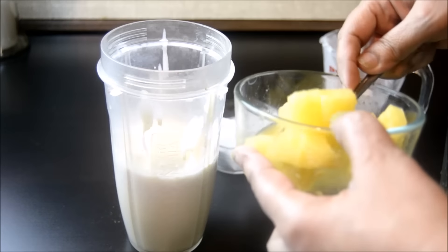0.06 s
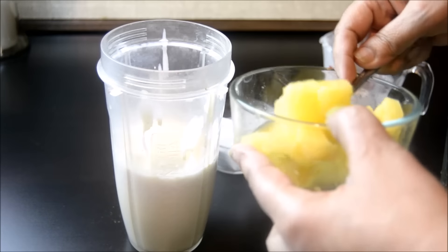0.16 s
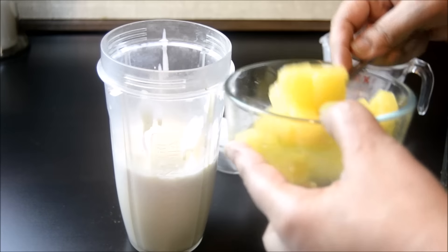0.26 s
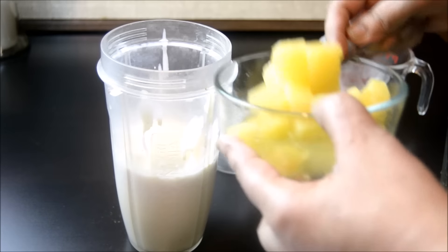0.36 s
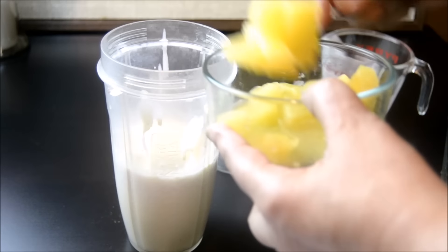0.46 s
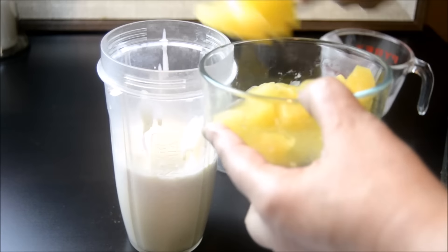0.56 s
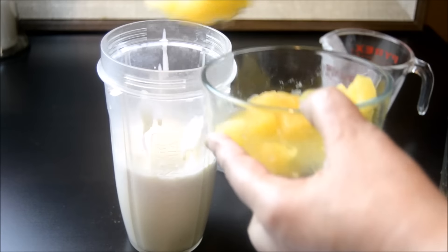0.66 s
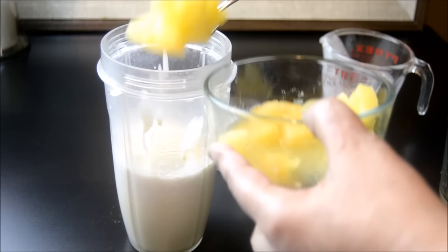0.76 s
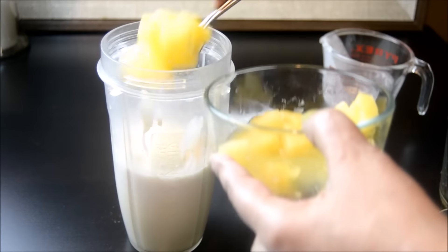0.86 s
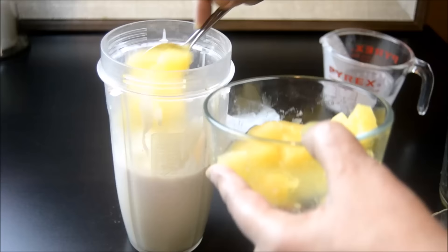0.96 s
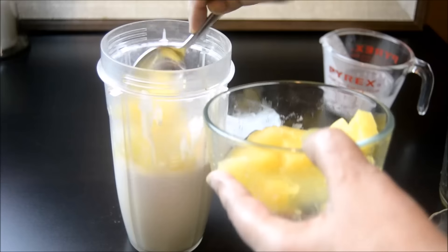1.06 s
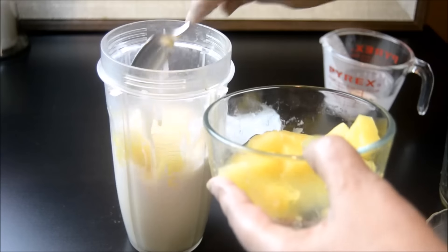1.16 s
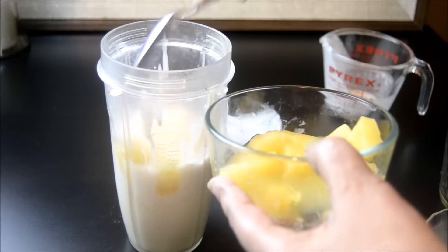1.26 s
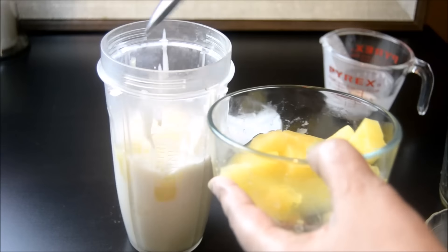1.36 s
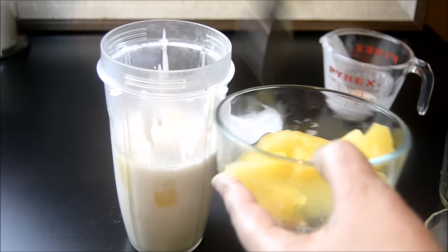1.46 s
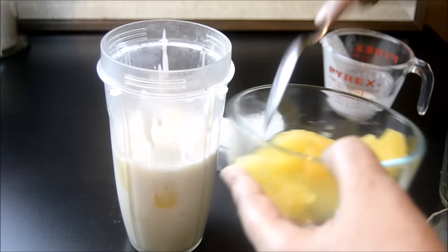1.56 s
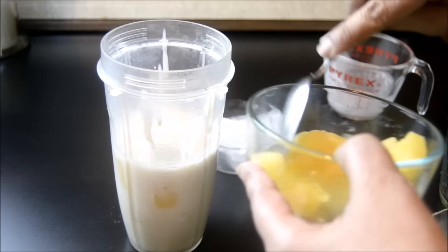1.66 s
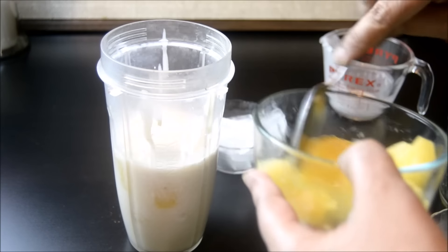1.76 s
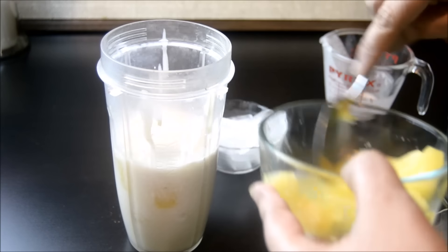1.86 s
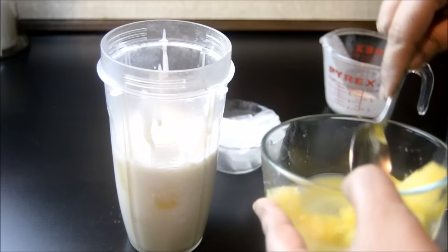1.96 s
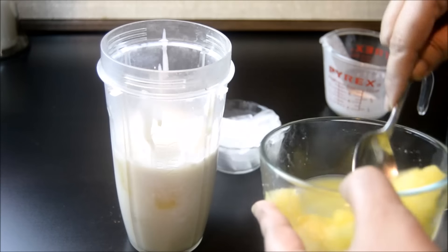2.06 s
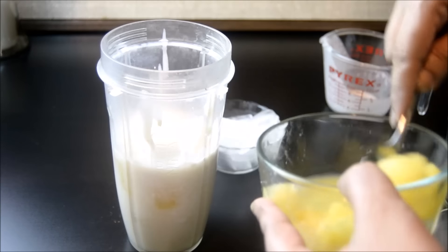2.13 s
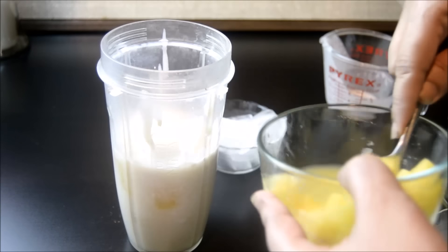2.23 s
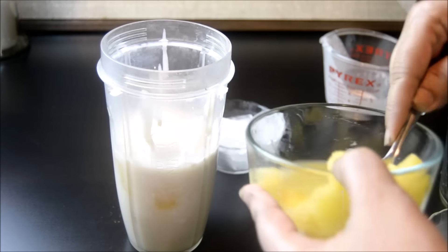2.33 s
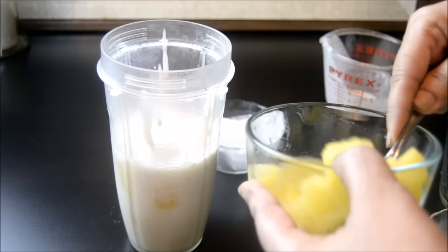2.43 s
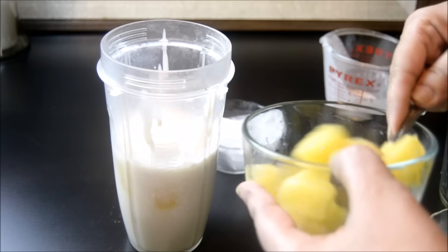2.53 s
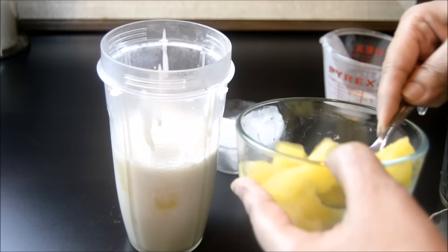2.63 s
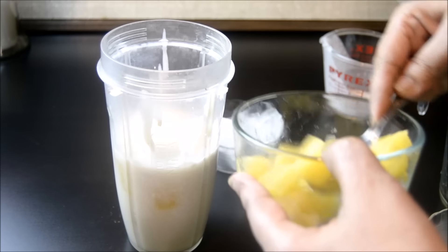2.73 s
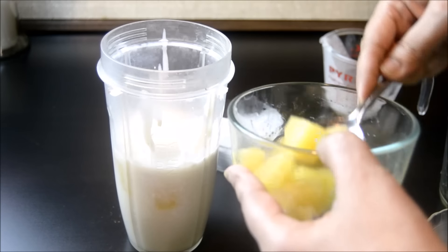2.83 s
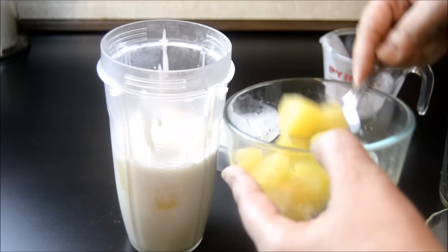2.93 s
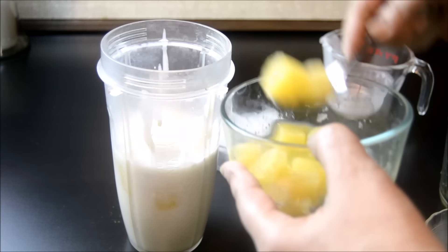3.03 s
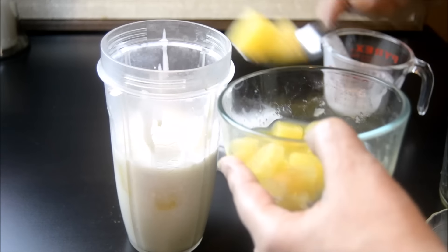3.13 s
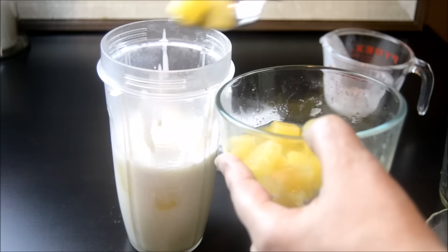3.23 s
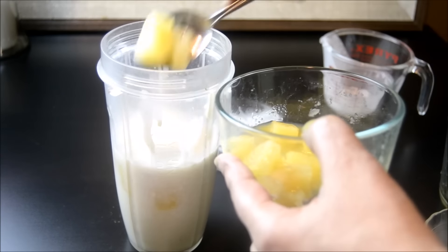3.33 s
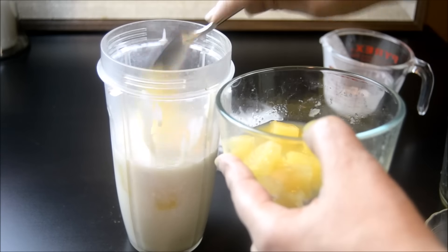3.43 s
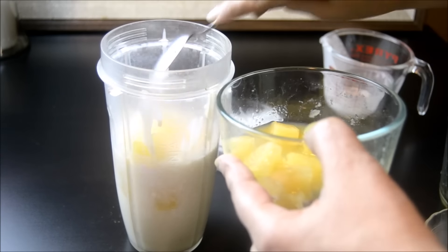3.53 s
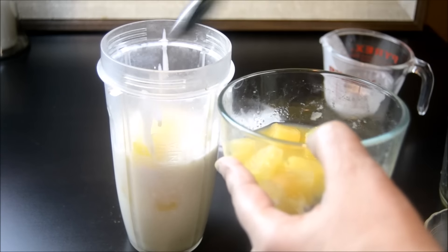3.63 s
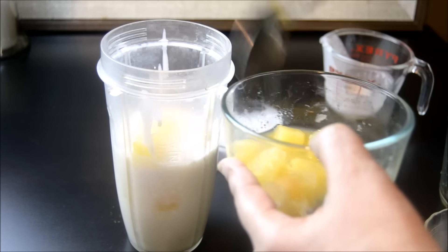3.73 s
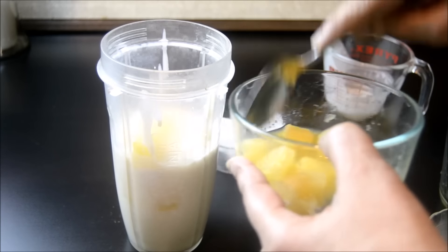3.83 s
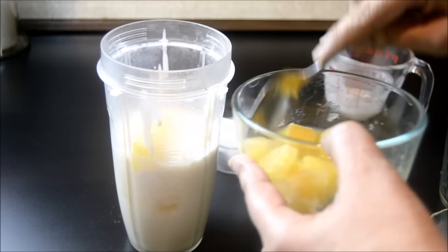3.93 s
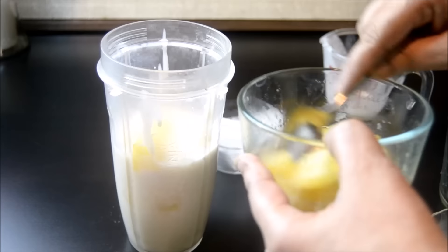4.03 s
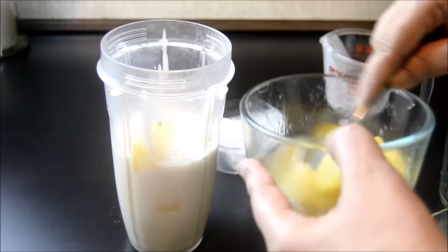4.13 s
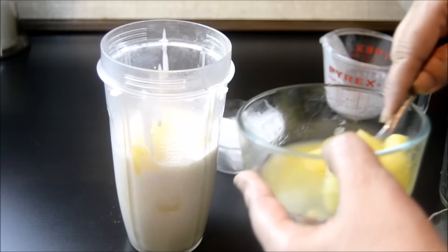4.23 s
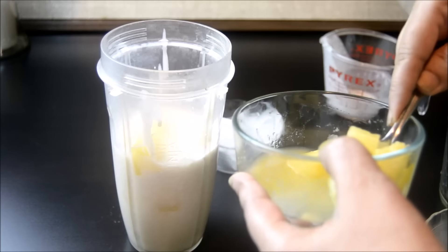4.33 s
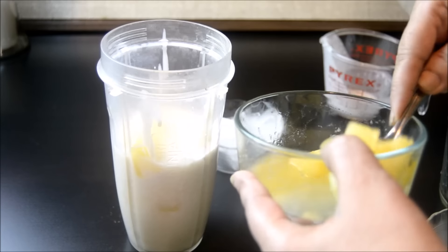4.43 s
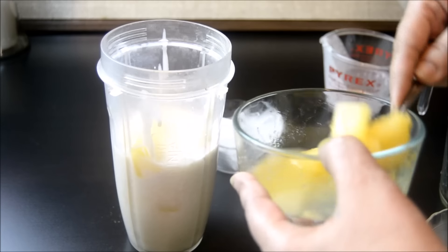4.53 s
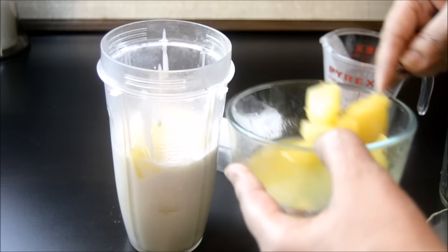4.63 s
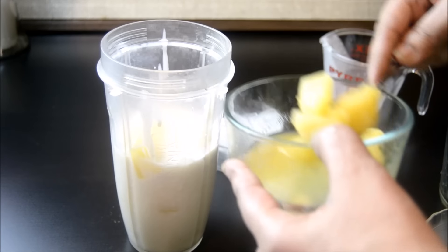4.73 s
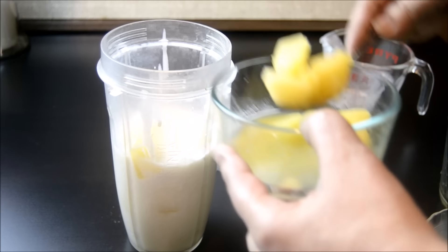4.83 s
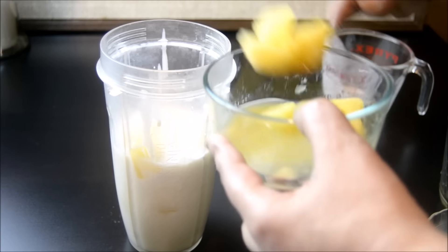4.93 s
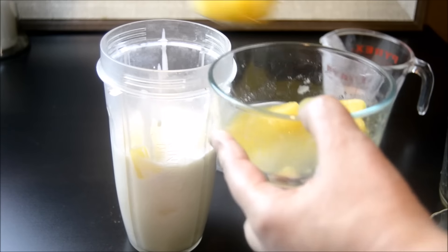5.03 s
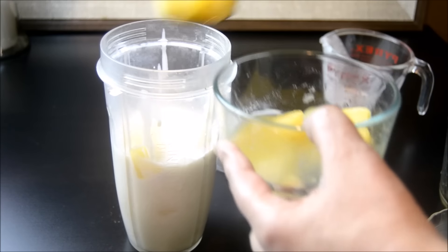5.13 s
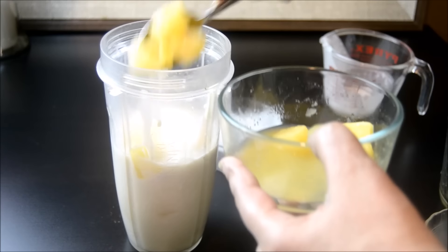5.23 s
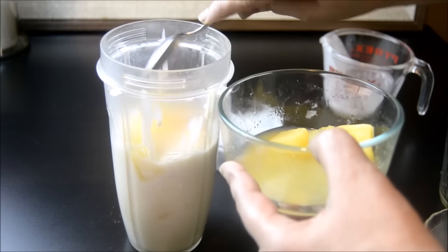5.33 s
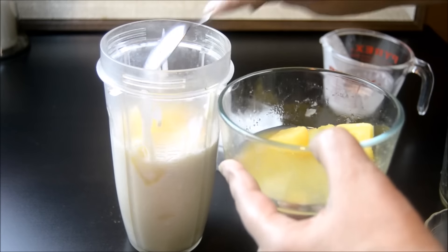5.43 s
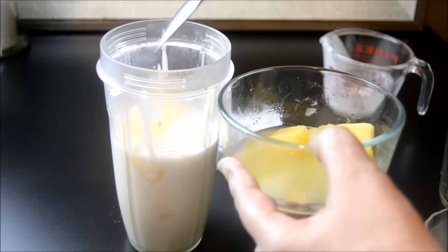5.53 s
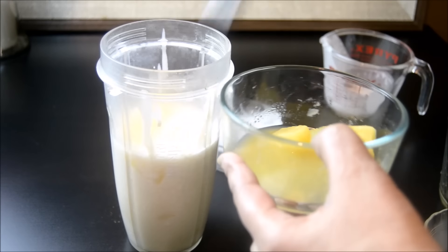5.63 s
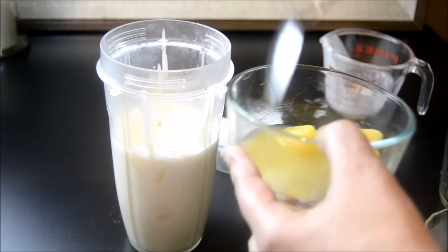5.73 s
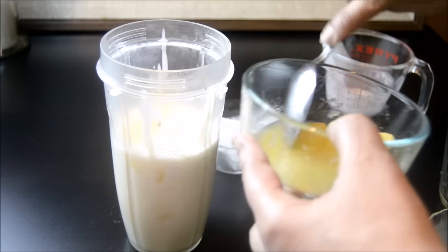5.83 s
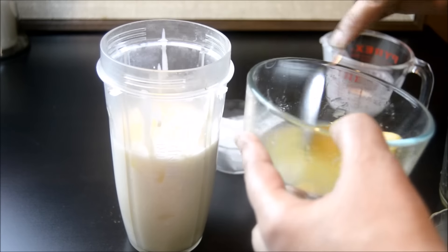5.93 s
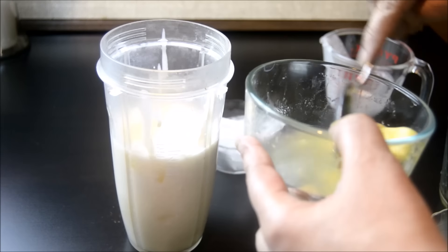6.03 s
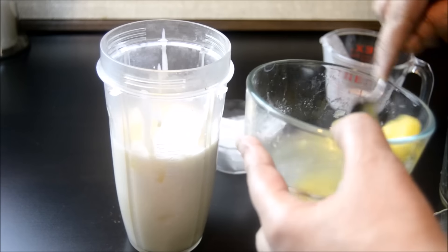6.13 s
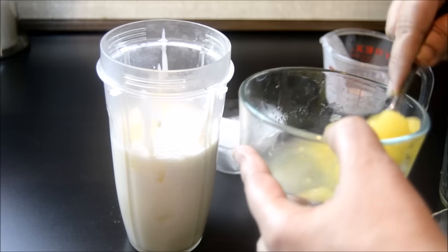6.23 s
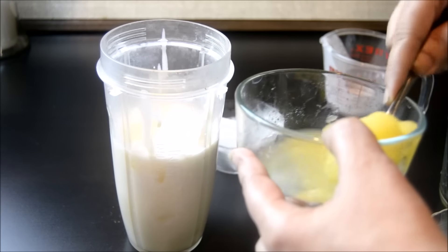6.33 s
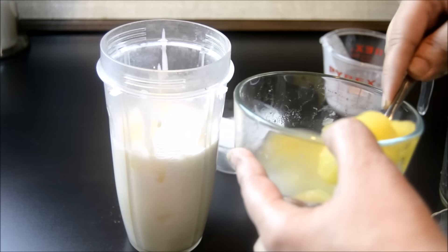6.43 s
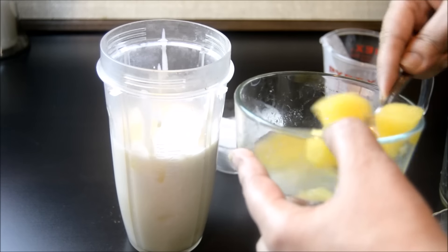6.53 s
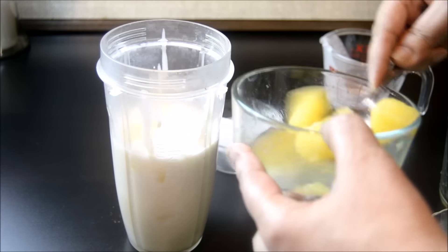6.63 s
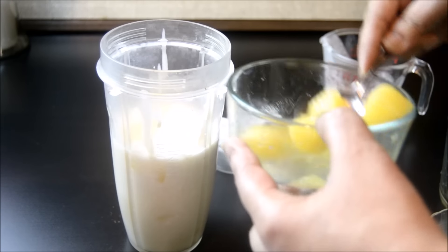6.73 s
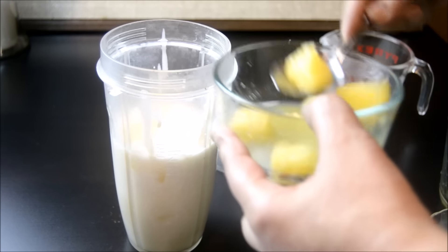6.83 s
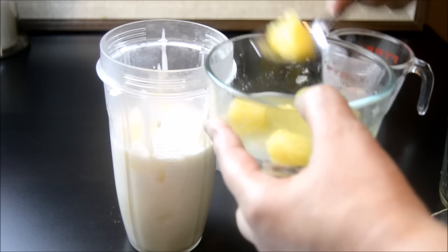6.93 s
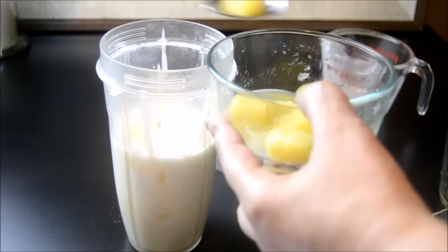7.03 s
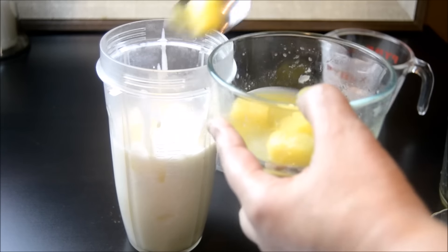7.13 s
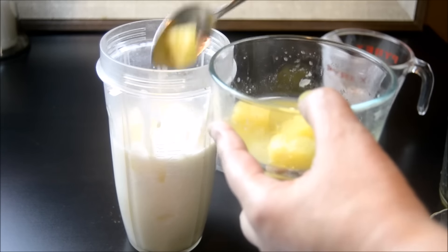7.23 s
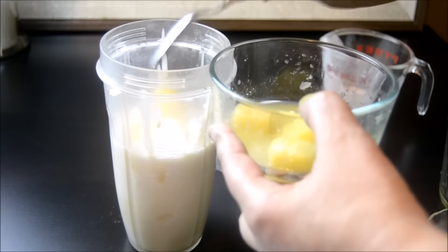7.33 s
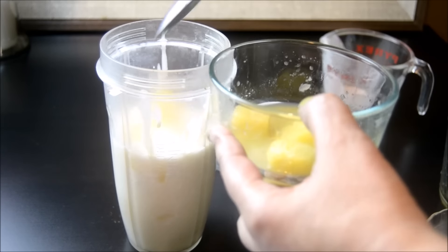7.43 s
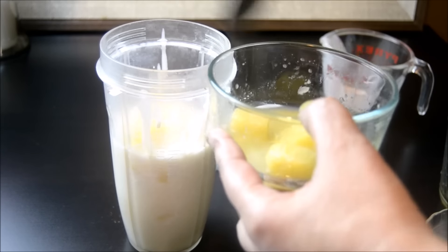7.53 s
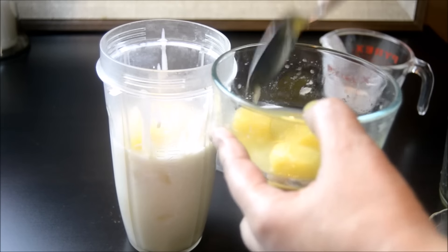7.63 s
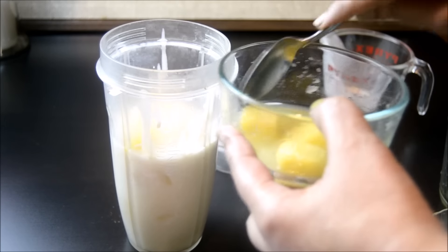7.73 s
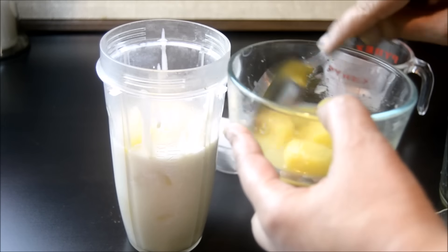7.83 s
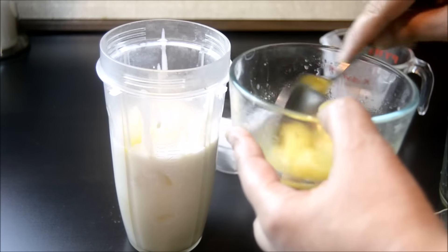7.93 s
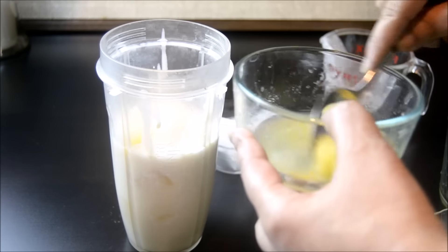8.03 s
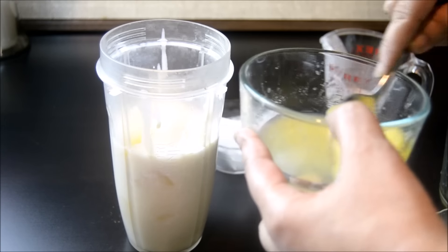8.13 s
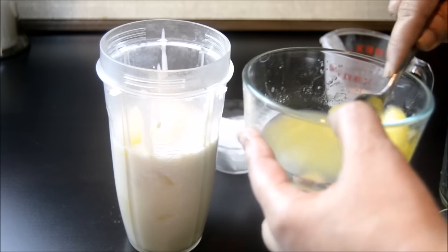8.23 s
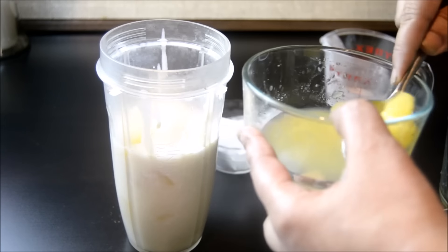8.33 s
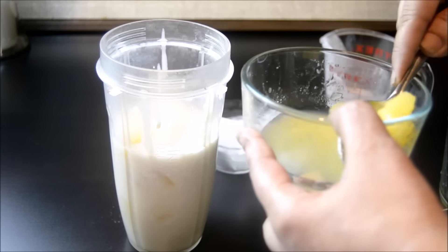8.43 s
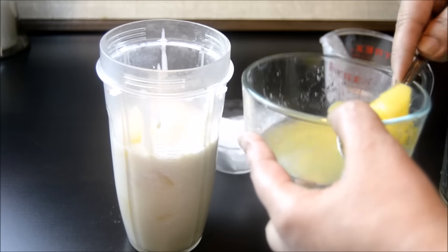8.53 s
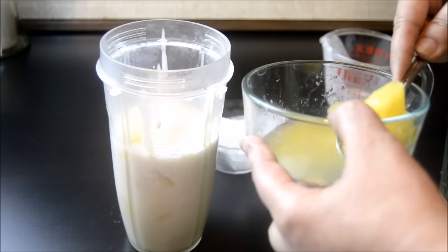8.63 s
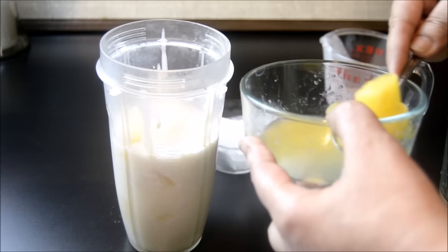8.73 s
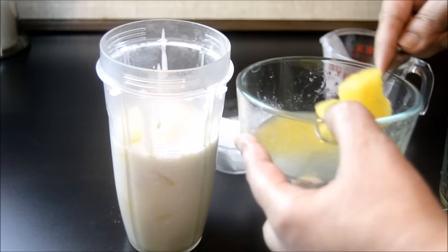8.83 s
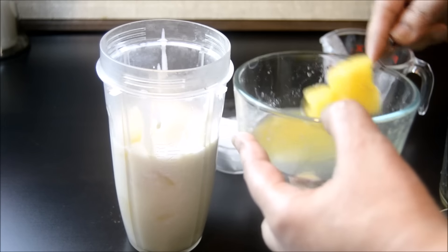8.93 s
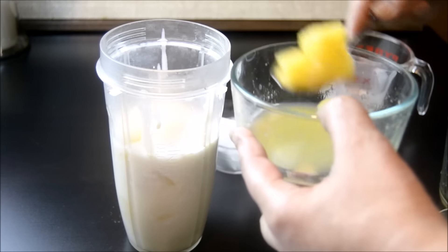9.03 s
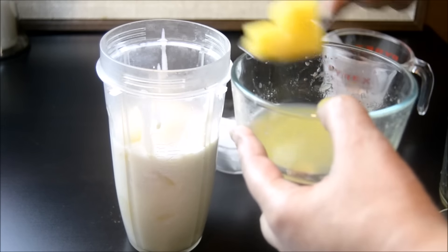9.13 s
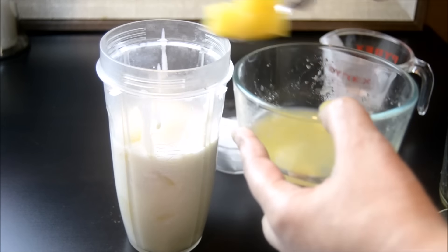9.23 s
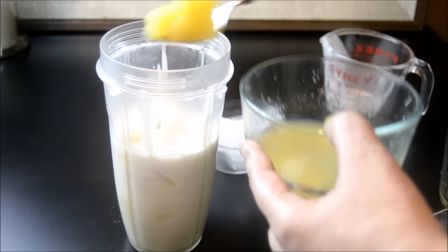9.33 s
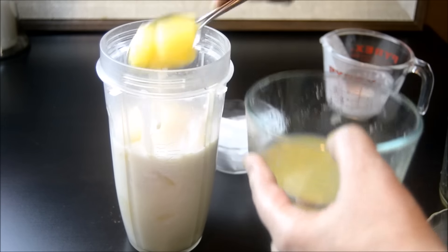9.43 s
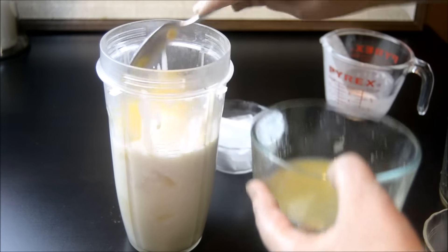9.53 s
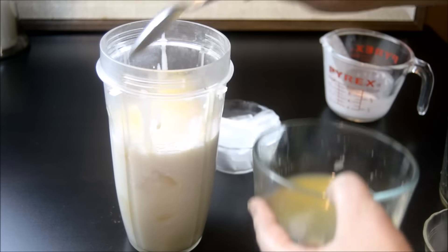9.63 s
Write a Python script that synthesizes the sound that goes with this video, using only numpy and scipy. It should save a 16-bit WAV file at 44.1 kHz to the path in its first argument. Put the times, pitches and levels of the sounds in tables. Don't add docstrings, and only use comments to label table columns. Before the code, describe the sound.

Close in a small hard kitchen, a steel spoon scoops fruit from a hand-held glass bowl. After a quiet second, soft wet plops land, then bright clinks come in uneven clusters, some hard and some muffled by fruit, each ringing briefly. Small juicy ticks fill the gaps. A soft plop and dull tap on a plastic cup come near the end, over faint hiss and fridge hum.

```python
import sys
import numpy as np
from scipy import signal
from scipy.fft import rfft, irfft
from scipy.io import wavfile

SR = 44100
rng = np.random.default_rng(int(sys.argv[2]) if len(sys.argv) > 2 else 0)


def volts_from_decibels(level):
    exponent = np.asarray(level, float) / 20
    return 10 ** exponent


def inscribe(sig):
    pcm = np.round(np.clip(np.atleast_2d(sig).T, -1, 1) * 32767)
    wavfile.write(sys.argv[1], SR, pcm.astype(np.int16))


N = 426447
PIVOT_HZ = 3500


def noise(length):
    return rng.standard_normal(length)


def fade(t60_s, length):
    return np.exp(-np.log(1000) * np.arange(length) / SR / max(t60_s, 1e-3))


def band(x, hz, width_hz):
    return signal.lfilter(*signal.iirpeak(min(hz, SR / 2.2), hz / width_hz, fs=SR), x)


def narrow(x, hz, width_hz):
    return band(band(x, hz, width_hz), hz, width_hz)


def peak(x, db):
    return x * volts_from_decibels(db) / np.max(np.abs(x))


def level(x, db):
    return x * volts_from_decibels(db) / np.std(x)


def add(track, s, x):
    i = int(s * SR)
    track[i:i + len(x)] += x[:N - i]


def air_hiss():
    # f/Hz, density/dB per Hz
    hiss_spectrum = [(40, -36.5), (88, -15.5), (118, -7.5), (380, -6.5), (1300, -12), (5000, -29),
                     (9500, -37.5), (11500, -49)]
    dip_hz, dip_width_hz, dip_db = 8100, 450, -4.5
    hz, db = np.transpose(hiss_spectrum)
    bins_hz = np.arange(N // 2 + 1) * SR / N + 1
    colour_db = np.interp(np.log(bins_hz), np.log(hz), db, left=-60, right=-80)
    colour_db = colour_db + dip_db * np.exp(-((bins_hz - dip_hz) / dip_width_hz) ** 2)
    return level(irfft(rfft(noise(N)) * volts_from_decibels(colour_db), N), -59)


def fridge():
    t = np.arange(N) / SR
    hum = level(np.sin(2 * np.pi * 119.6 * t), -67.5)
    whine = level(np.sin(2 * np.pi * 1193 * t), -79)
    fan = level(narrow(noise(N), 188.5, 16), -69)
    return hum + whine + fan


def rumble():
    rise_s, from_db, to_db = 4.9, -99, -85.5
    gain_db = np.interp(np.arange(N) / SR, [0, rise_s], [from_db, to_db])
    return level(narrow(noise(N), 29, 8), 0) * volts_from_decibels(gain_db)


def fruit_plops():
    # t/s, peak/dB, thump/dB, hollow/dB, t60/s
    plops = [(1.076, -44.5, -28, -7, 0.03), (1.0814, -43.5, -28, -11, 0.06), (1.097, -46, -22, -8, 0.041),
             (1.117, -60, -11, 11, 0.02), (1.152, -44, -25, -3, 0.044), (1.1565, -46.5, -25, 1, 0.07),
             (1.228, -47.5, -26, 6, 0.025), (4.882, -42, -0.5, -2, 0.079), (5.329, -39, -37, -6, 0.033),
             (5.375, -46.5, -16.5, 2.5, 0.087), (6.905, -40.5, -0.5, -1, 0.034),
             (9.458, -37, -7.5, -6, 0.019), (9.5283, -31.5, -13, -7, 0.0066)]
    out, n = np.zeros(N), SR // 8
    for s, db, thump_db, hollow_db, t60_s in plops:
        slap = noise(n) * fade(t60_s, n)
        blow = noise(n) * fade(0.011, n)
        add(out, s, peak(narrow(slap, 2000, 4000), db))
        add(out, s, peak(narrow(slap, 10000, 7100), db - 17))
        add(out, s, peak(narrow(blow, 900, 250), db + hollow_db))
        add(out, s, peak(narrow(slap, 370, 170), db + thump_db))
    return out


def juice_ticks():
    # t/s, peak/dB, f/Hz, t60/s
    ticks = [(1.079, -54, 9600, 0.044), (1.201, -57, 9800, .02), (1.213, -60, 9000, .02),
             (1.824, -53.5, 7360, 0.02), (1.903, -53.5, 5440, 0.058), (1.926, -58, 9100, 0.025),
             (2.203, -63, 9500, .02), (2.74, -51.5, 4230, 0.047), (2.743, -57.5, 9200, 0.054),
             (2.858, -61, 9800, .015), (3.463, -56.5, 6300, 0.029), (3.464, -61.5, 9700, .025),
             (3.510, -60.5, 9300, .02), (5.328, -53.5, 9470, 0.2), (5.99, -57.5, 9050, .02),
             (6.699, -58.5, 7900, 0.019), (6.823, -53, 5440, 0.016), (6.824, -57, 7120, 0.05),
             (6.878, -68, 8400, 0.022), (7.062, -68, 10300, .02), (7.157, -60, 9600, 0.016),
             (7.782, -34.5, 4830, 0.02), (7.805, -39.5, 6540, .02), (7.806, -50.5, 10300, .03),
             (7.904, -58, 5470, .02), (8.135, -61, 4900, 0.018), (8.22, -48, 2200, 0.061),
             (8.223, -57, 5400, .05), (8.226, -48.5, 3100, .06), (1.081, -50, 6500, .015),
             (1.0955, -48, 5460, .015), (1.161, -48, 4600, .03), (9.499, -70, 9500, 0.018),
             (9.556, -62, 9600, .021)]
    out, n = np.zeros(N), SR // 8
    for s, db, hz, t60_s in ticks:
        add(out, s, peak(narrow(noise(n) * fade(t60_s, n), hz, 0.25 * hz), db))
    return out


def contact_clicks():
    # t/s, peak/dB, f/Hz, width/Hz
    clicks = [
        (5.8325, -9.5, 2500, 4500),
        (1.152, -39, 1300, 2500),
        (1.2283, -37, 1260, 1200),
        (1.231, -41, 1060, 1200),
        (9.5262, -30.5, 2240, 4000),
        (2.2205, -18, 3500, 3700),
    ]
    out, n = np.zeros(N), 2 ** 14
    for s, db, hz, width_hz in clicks:
        add(out, s, peak(narrow(signal.unit_impulse(n), hz, width_hz), db))
    return out


def ring_spectra(pitches_hz, shape, size):
    hz = np.array(pitches_hz)[:, None]
    width_hz, db = np.transpose(shape)[:, :, None]
    t = np.arange(size) / SR
    damping_hz = np.clip(width_hz / 1.35, 8, 900)
    start_rad = 2 * np.pi * (hz / PIVOT_HZ) ** 2
    walk = np.repeat(np.cumsum(rng.standard_normal((len(hz), size // 64)), axis=1), 64, axis=1)
    phase_rad = start_rad + 0.035 * np.sqrt(np.clip(width_hz - 30, 0, 400)) * walk
    attack = 1 - np.exp(-t / 0.00084)
    sines = np.exp(-np.pi * damping_hz * t) * np.sin(2 * np.pi * hz * t + phase_rad) * attack
    return rfft(volts_from_decibels(db) * np.sqrt(width_hz * damping_hz) * sines)


def spoon_blows(echoes):
    rim_hz = [1305, 2968, 5145, 7785, 10960]
    # width/Hz, level/dB
    rim_shape = [(20, 3), (22, 3.5), (30, -8.5), (35, -17), (40, -16)]
    # width/Hz, level/dB
    rim_edge = ([1310, 2185, 2960, 3950, 5148, 5430, 5850, 7820, 8150, 9380, 10450, 10950], [(60, -6),
                (90, -13), (50, -4), (200, -14), (50, -2.5), (25, -6), (45, -3), (144, -14), (91, -20.5),
                (105, -18.5), (102, -23), (69, -17.5)])
    mid_wall = ([1320, 2110, 2980, 3280, 3830, 4500, 5140, 5650, 7080, 7790, 9280], [(60, -22), (250, -15),
                (38, -3), (244, -15), (200, -18), (140, -20.5), (60, -18), (250, -15), (69, -22), (75, -22),
                (110, -30)])
    side_glance = ([1100, 1465, 2154, 2632, 3030, 3780, 4210, 5820, 7130, 9540, 10030, 10390], [(380, -17),
                   (127, -17), (140, -9), (145, -10.5), (123, -12.5), (120, -7), (80, -2.5), (196, -15.5),
                   (93, -15.5), (573, -13.5), (130, -14.5), (121, -13)])
    fruit_edge = ([1204, 2141, 2640, 3280, 5140, 5400, 6180, 6850, 7770, 10970], [(183, -20.5), (159, -4),
                  (208, -9), (306, -10.5), (96, -14), (200, -11), (115, -21), (72, -16), (161, -15),
                  (56, -23)])
    far_wall = ([1300, 2430, 2985, 3300, 5140, 6790, 7760], [(100, -19), (150, -14), (45, -4), (600, -17),
                (55, -5), (50, -20), (82, -23)])
    upper_wall = ([1320, 2134, 2975, 3450, 4700, 5100, 5450, 5800, 6700, 7830, 8190, 8700, 9500, 11000],
                  [(110, -13), (194, -27), (45, -8), (168, -19), (70, -11), (165, 0.1), (70, -12),
                  (140, -13), (115, -22), (125, -14), (200, -15), (110, -19), (100, -18), (40, -16)])
    spoon_tip = ([1236, 2144, 3750, 5620, 6360, 6540, 6780, 7080, 8240, 10720], [(341, -8.5), (111, -13),
                 (120, -8.5), (175, -18.5), (75, -6), (86, -9), (125, 0.1), (45, -6), (123, -17),
                 (118, -14)])
    flat_slap = ([1400, 3190, 3760, 4270, 5810, 6150, 7070, 8310, 9230, 10610], [(460, -2.2), (560, -1.5),
                 (28, -3), (460, -2.2), (200, -4.5), (420, -3), (156, -6), (112, -15), (107, -7),
                 (123, -11)])
    under_fruit = ([1380, 1929, 2181, 2451, 2900, 3340, 4460, 5260, 5830, 7800, 9240, 9810, 10980],
                   [(283, -11.5), (107, -3), (70, -0.6), (314, -0.6), (200, -5), (242, 1.5), (100, -7),
                   (330, -3.5), (260, -6), (86, -17), (204, -13), (22, -12), (31, -23)])
    through_fruit = ([1010, 1336, 2390, 2985], [(340, -9), (19, 1.5), (80, -9), (23, -0.6)])
    first_touch = ([1300, 3010, 5160, 5960, 7800, 9430], [(40, -3), (40, 0), (40, 1.8), (150, -14),
                   (60, -13), (200, -17.5)])
    spoon_edge = ([1295, 2174, 2992, 3770, 4110, 4345, 5150, 5620, 5920, 6900, 7110, 9410, 10375],
                  [(90, -8.5), (340, -13.5), (152, -11), (45, -4), (120, -2), (110, -2), (89, -12),
                  (146, -16.5), (111, -17.5), (84, 0.1), (22, -11), (438, -21.5), (87, -9)])
    bottom = ([1790, 2182, 3090, 3830, 3934, 4497, 5120, 5730, 6420, 6940, 7412, 7760, 9230, 10780],
              [(240, -7), (56, -6.5), (200, 0.5), (104, 1.5), (21, -0.6), (30, 3), (40, -3), (150, -6.5),
              (41, -13), (114, -6.5), (29, -5), (32, -10.5), (30, -14), (101, -9.5)])
    upper_rim = ([1270, 2210, 2960, 3310, 4830, 5020, 5160, 5370, 5700, 6790, 7250, 7770, 8020, 9500],
                 [(90, -12), (100, -22), (60, -6), (100, -19), (50, -7), (60, -4), (93, 0.1), (50, -14),
                 (100, -13), (300, -21), (100, -14), (60, -7), (80, -15), (60, -21)])
    curve = ([1325, 2190, 2443, 2965, 3200, 3880, 4140, 4400, 4850, 5170, 5495, 7770, 8960], [(160, -15),
             (140, -15), (55, -10.5), (60, -8), (150, -9), (105, -1.5), (39, -9), (30, -0.6), (50, -12),
             (75, -5), (110, -1.2), (63, -24), (258, -18.5)])
    cup_lip = ([928, 1690, 3200, 4160, 5000, 6000, 7320], [(320, -7), (518, -5.5), (500, -3.5), (700, -3),
               (700, -8), (800, -11), (700, -11)])
    # t/s, peak/dB, brightness/dB per octave, crack/dB, rim ring/dB
    rim_edge_blows = [
        (1.629, -18, 0.5, -1, -23.5),
        (1.6366, -19.5, -1, -5, -17),
    ]
    mid_wall_blows = [
        (6.07, -22, -0.6, -11, -18.5),
        (7.971, -30, 1.5, -11, -21),
        (8.016, -43, -2.2, -16, -22.5),
        (1.82, -43.5, -1.8, -1.5, -34),
    ]
    side_glance_blows = [(2.22, -14, 0.1, -5, -34)]
    fruit_edge_blows = [(2.339, -19.5, 0.1, -14, -26)]
    far_wall_blows = [(2.495, -27.5, 0.1, -15, -38)]
    upper_wall_blows = [
        (3.832, -12.5, -1.5, -4.5, -24),
        (3.843, -25.5, 5, -21, -29),
    ]
    spoon_tip_blows = [(4.001, -23.5, 0.11, -0.67, -39)]
    flat_slap_blows = [(4.18, -23, 0.55, -4.5, -22)]
    under_fruit_blows = [(4.263, -17, 0.1, -7, -20)]
    through_fruit_blows = [
        (4.88, -38.5, -0.52, -15, -21),
        (6.903, -46, 1.5, -10, -28),
    ]
    first_touch_blows = [(5.821, -15.5, 0.12, -10, -20.5)]
    spoon_edge_blows = [(5.832, -8.5, 0.1, -13.5, -19)]
    bottom_blows = [
        (6.255, -7.5, -0.6, -8.5, -23),
        (6.2657, -14.5, -0.53, -11.5, -38),
    ]
    upper_rim_blows = [(7.703, -14, 0.1, -4, -19)]
    curve_blows = [
        (8.266, -13, 0.76, -7, -38),
        (8.302, -20, -1.5, -16.5, -20),
    ]
    cup_lip_blows = [(9.526, -27.5, 0.1, -14, -44)]
    # (rings, blows, knock/dB, chatter/dB)
    struck_spots = [
        (rim_edge, rim_edge_blows, -22, 0.5),
        (mid_wall, mid_wall_blows, -25, -1.9),
        (side_glance, side_glance_blows, -24, -10),
        (fruit_edge, fruit_edge_blows, -21, -11),
        (far_wall, far_wall_blows, -25, 0.1),
        (upper_wall, upper_wall_blows, -53, -3),
        (spoon_tip, spoon_tip_blows, -13.5, -1.2),
        (flat_slap, flat_slap_blows, -25, -2),
        (under_fruit, under_fruit_blows, -17.5, -0.82),
        (through_fruit, through_fruit_blows, -14, 2.5),
        (first_touch, first_touch_blows, -26, -1.7),
        (spoon_edge, spoon_edge_blows, -14.5, -1.7),
        (bottom, bottom_blows, -33.5, 1.4),
        (upper_rim, upper_rim_blows, -24.5, -2),
        (curve, curve_blows, -22, -1.3),
        (cup_lip, cup_lip_blows, -13, -6),
    ]
    out, n = np.zeros(N), 2 ** 14
    path = 1 + rfft(echoes[:n])
    for (spot_hz, spot_shape), blows, knock_db, chatter_db in struck_spots:
        width_hz, spot_db = np.transpose(spot_shape)
        octaves = np.log2(np.array(spot_hz) / PIVOT_HZ)
        for s, db, bright_db, crack_db, rim_db in blows:
            chatter = noise(n) ** 3 * fade(0.032, n)
            rattle = 1 + rfft(chatter) * volts_from_decibels(chatter_db) / np.linalg.norm(chatter)
            spot_struck = np.transpose([width_hz, spot_db + bright_db * octaves])
            sound = 0
            for pitches_hz, shape, share_db in ((spot_hz, spot_struck, 0), (rim_hz, rim_shape, rim_db)):
                modes = ring_spectra(pitches_hz, shape, n)
                heard = np.linalg.norm(modes * rattle * path, axis=1) / np.linalg.norm(modes, axis=1)
                ring = irfft(np.sum(modes * rattle / heard[:, None], axis=0))
                sound = sound + peak(ring, share_db)
            burst = noise(n) * fade(0.0092, n)
            crack = peak(narrow(burst, 3500, 6500), crack_db)
            knock = peak(narrow(burst, 920, 830), knock_db)
            shimmer = peak(narrow(noise(n) * fade(0.048, n), 4100, 7000), -20)
            add(out, s, peak(sound + crack + knock + shimmer, db))
    return out


def small_glass(x):
    return signal.sosfilt(signal.butter(4, 624, "high", fs=SR, output="sos"), x)


def kitchen_echoes():
    # f/Hz, t60/s, level/dB
    echo_bands = [(499.5, 0.067, 6.5), (1400, 0.35, 7.5), (2320, 0.51, -1), (4450, 0.5, -1.5),
                  (7000, 0.46, -6), (9900, 0.27, 4.5)]
    n, onset_s = int(0.6 * SR), 0.0025
    tail = np.zeros(n)
    for hz, t60_s, db in echo_bands:
        tail += volts_from_decibels(db) * band(noise(n), hz, hz) * fade(t60_s, n)
    tail = tail * (1 - np.exp(-np.arange(n) / SR / onset_s))
    return tail * volts_from_decibels(-6.5) / np.linalg.norm(tail)


def scene():
    echoes = kitchen_echoes()
    background = air_hiss() + fridge() + rumble()
    spoon = small_glass(contact_clicks() + spoon_blows(echoes))
    near = fruit_plops() + juice_ticks() + spoon
    return (near + signal.fftconvolve(near, echoes)[:N] + background)[None]


def band_limit(x):
    return signal.sosfilt(signal.butter(12, 12120, fs=SR, output="sos"), x)


def record(dry):
    top_hz = 10980
    low_pass = signal.cheby2(10, 45, 1.097 * top_hz, fs=SR, output="sos")
    mix = signal.sosfilt(low_pass, dry[0])
    return band_limit(mix)


dry = scene()
out = record(dry)
inscribe(out)
```